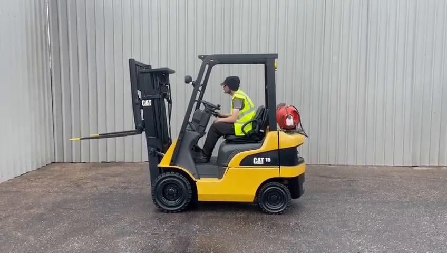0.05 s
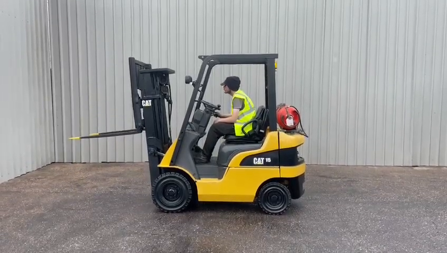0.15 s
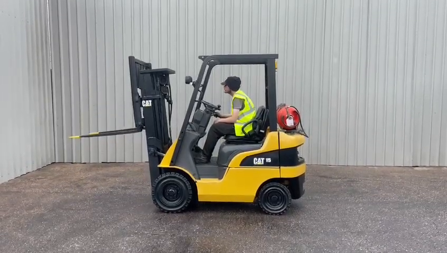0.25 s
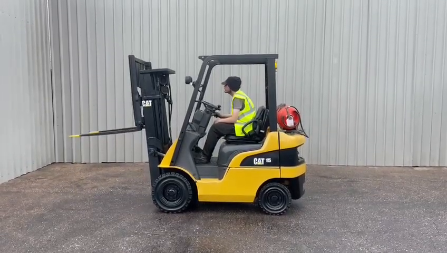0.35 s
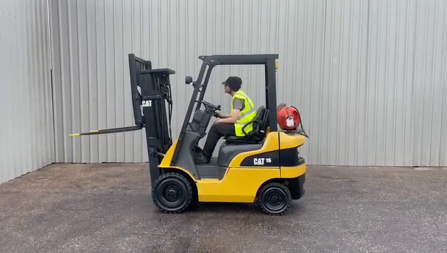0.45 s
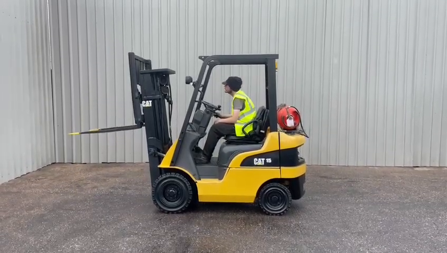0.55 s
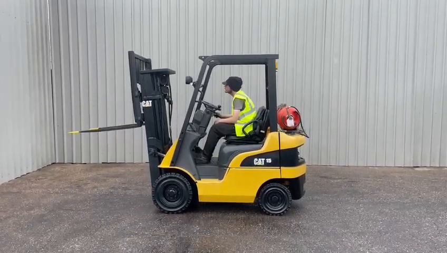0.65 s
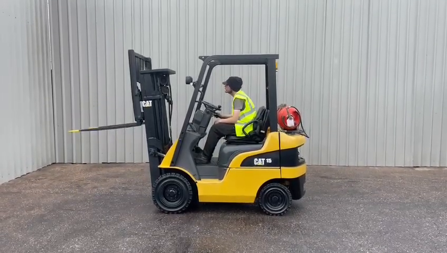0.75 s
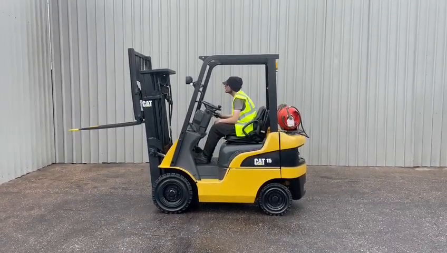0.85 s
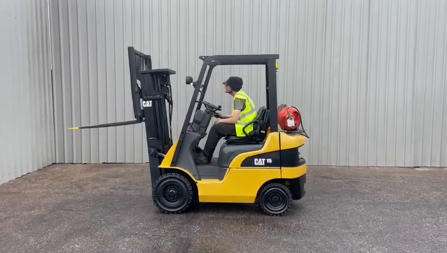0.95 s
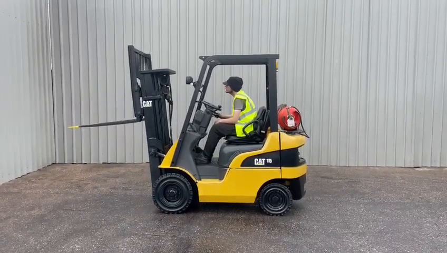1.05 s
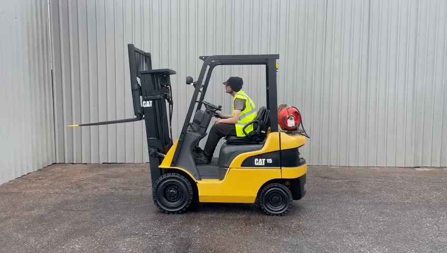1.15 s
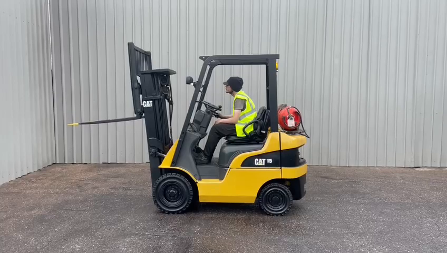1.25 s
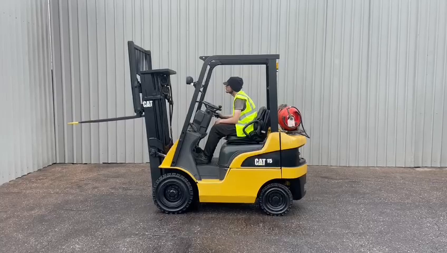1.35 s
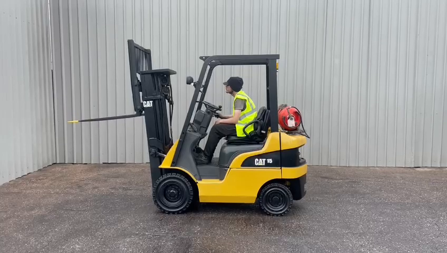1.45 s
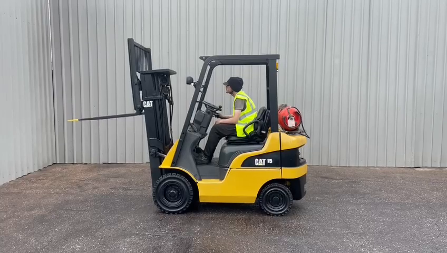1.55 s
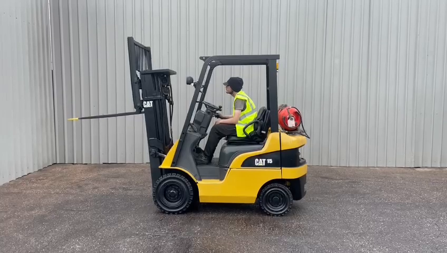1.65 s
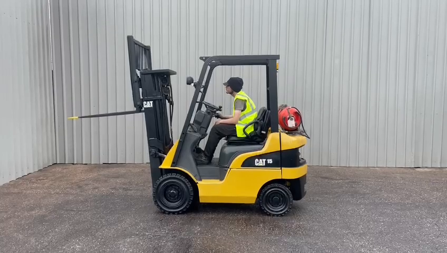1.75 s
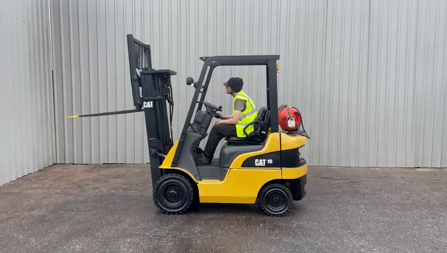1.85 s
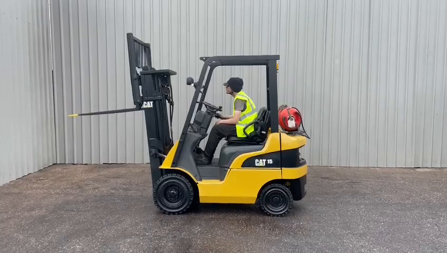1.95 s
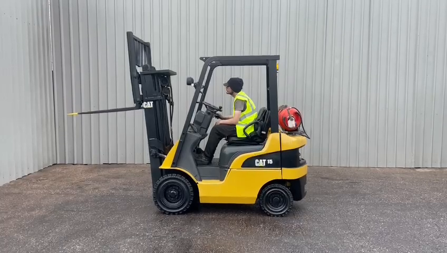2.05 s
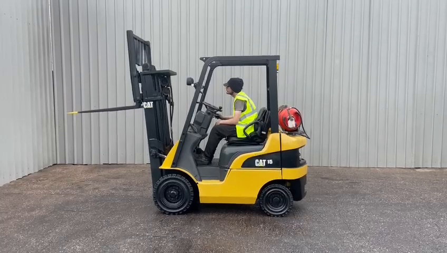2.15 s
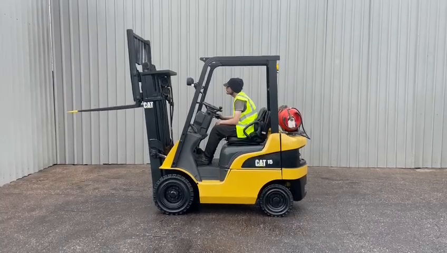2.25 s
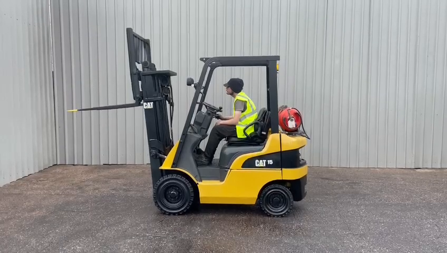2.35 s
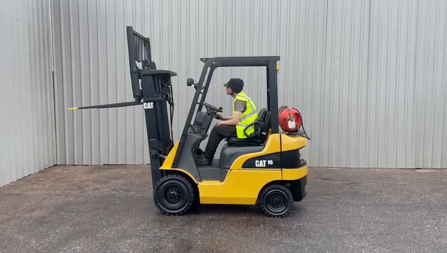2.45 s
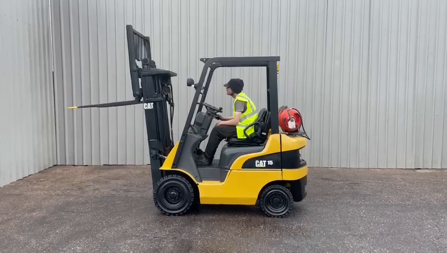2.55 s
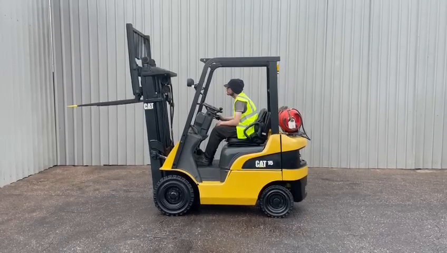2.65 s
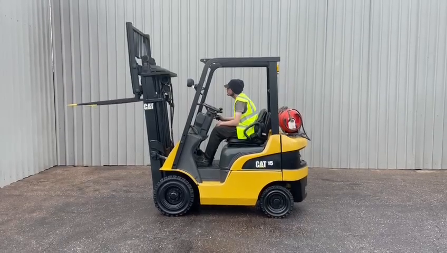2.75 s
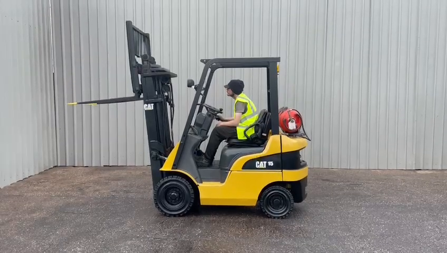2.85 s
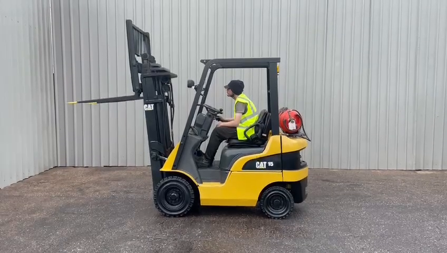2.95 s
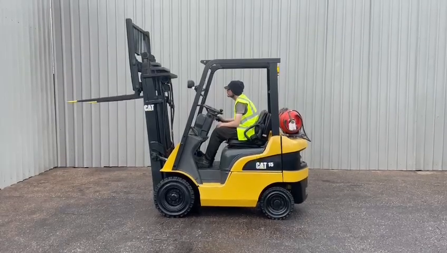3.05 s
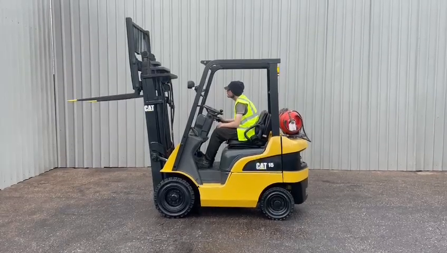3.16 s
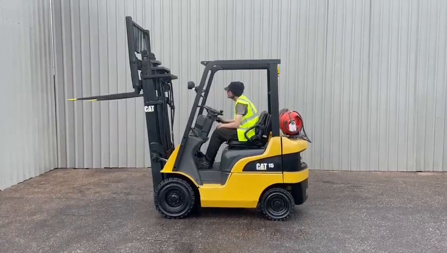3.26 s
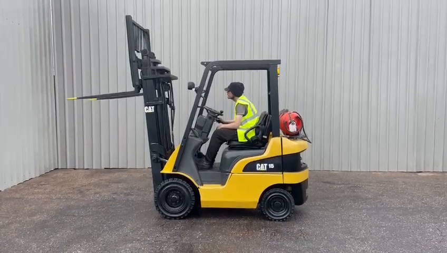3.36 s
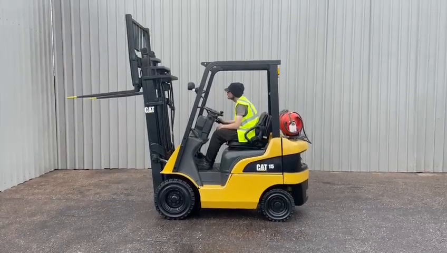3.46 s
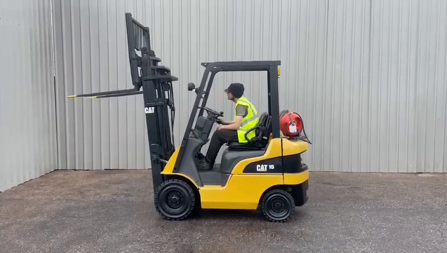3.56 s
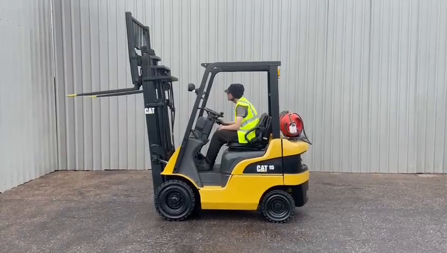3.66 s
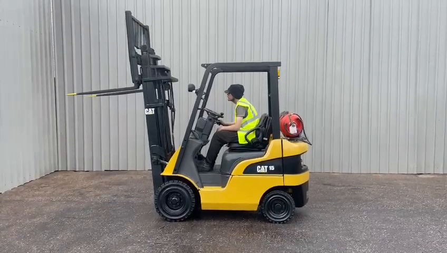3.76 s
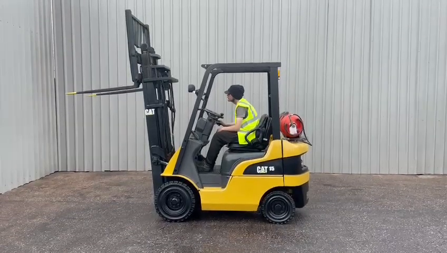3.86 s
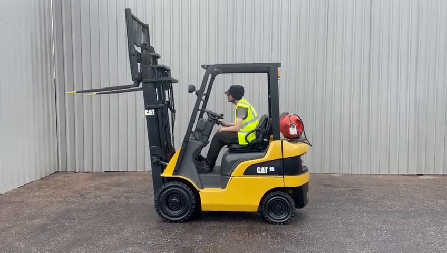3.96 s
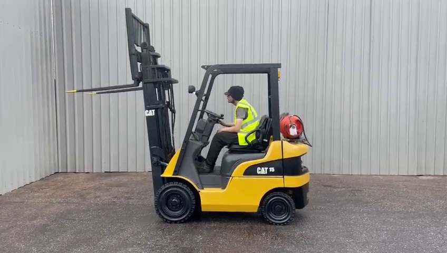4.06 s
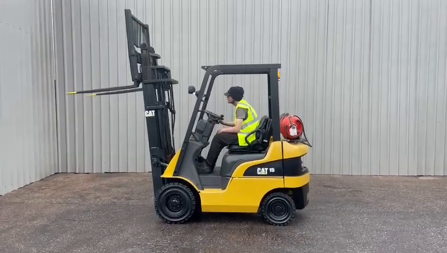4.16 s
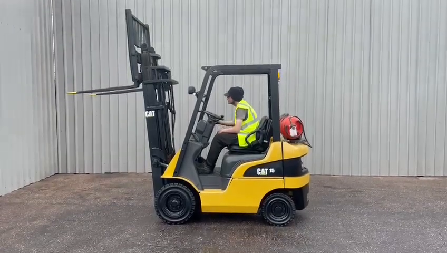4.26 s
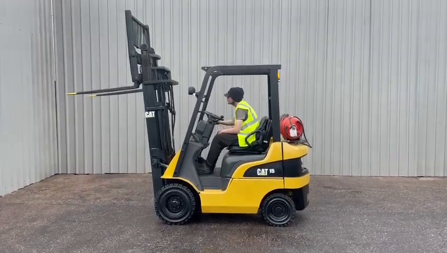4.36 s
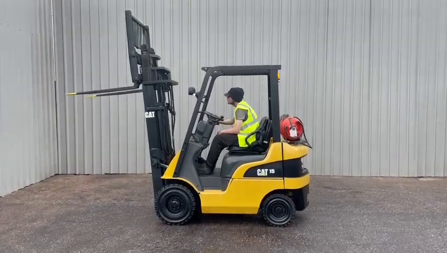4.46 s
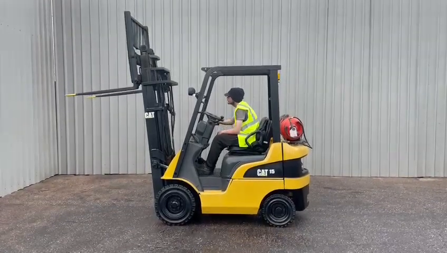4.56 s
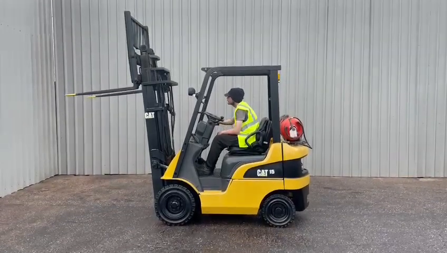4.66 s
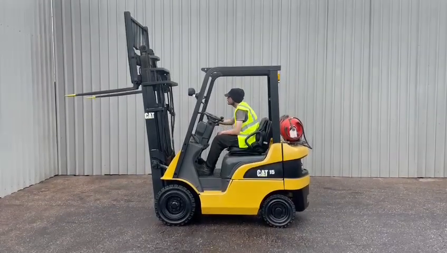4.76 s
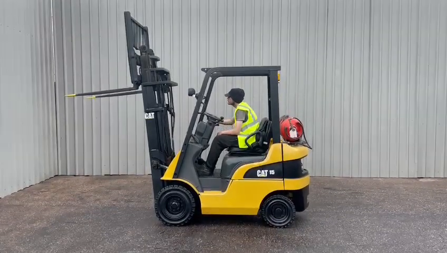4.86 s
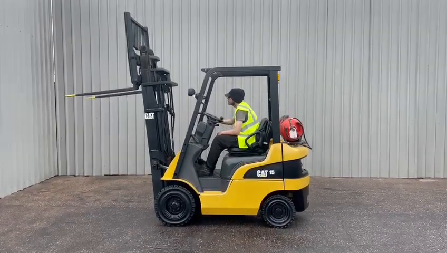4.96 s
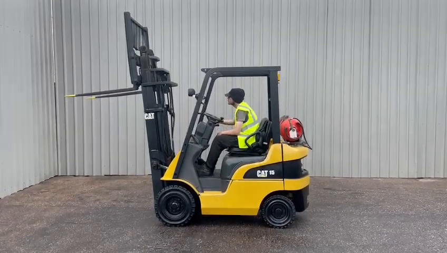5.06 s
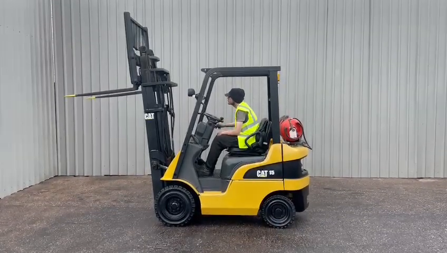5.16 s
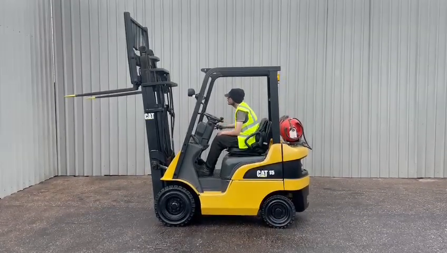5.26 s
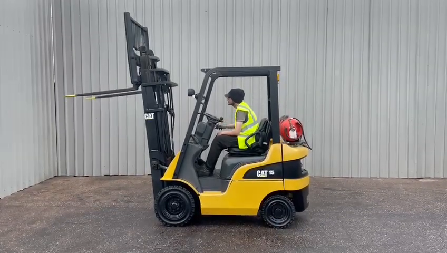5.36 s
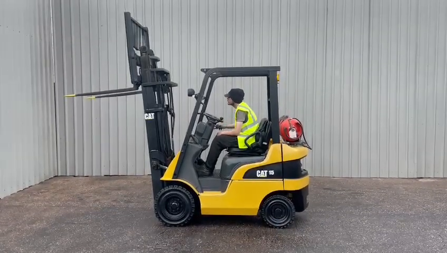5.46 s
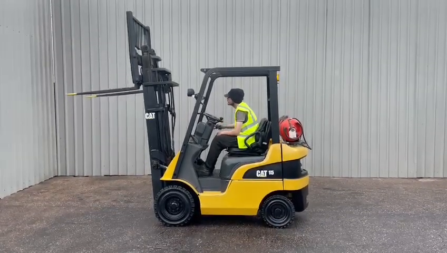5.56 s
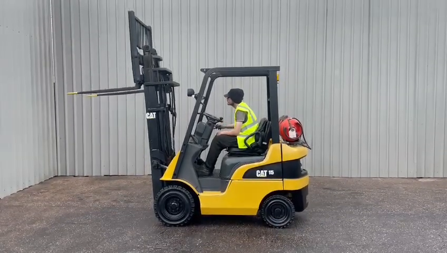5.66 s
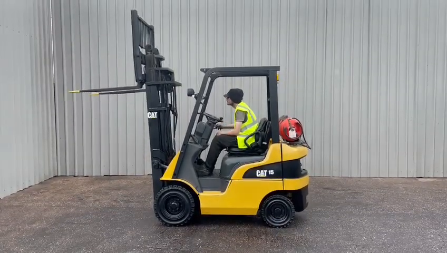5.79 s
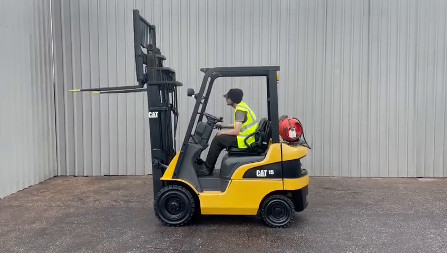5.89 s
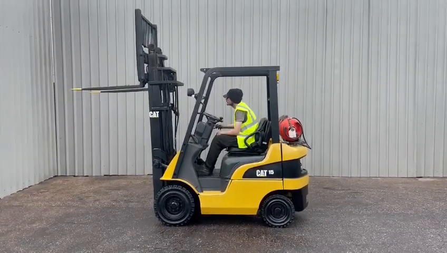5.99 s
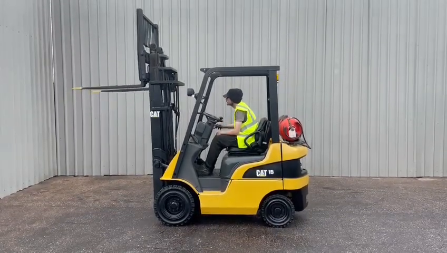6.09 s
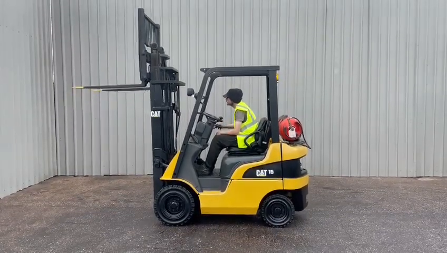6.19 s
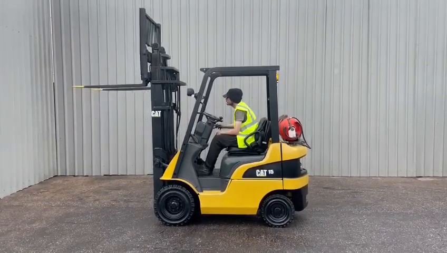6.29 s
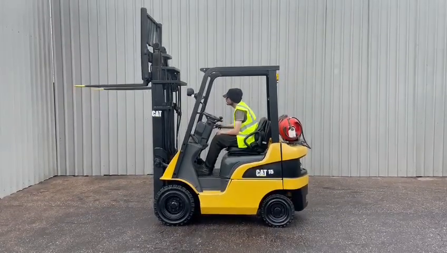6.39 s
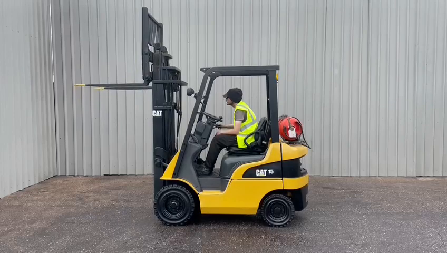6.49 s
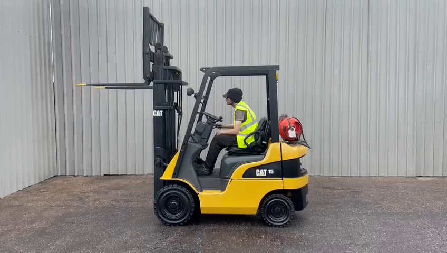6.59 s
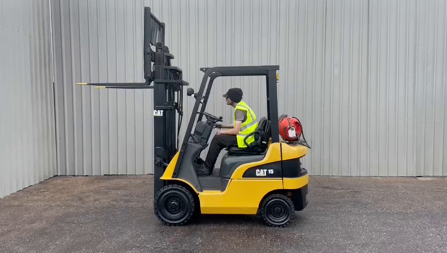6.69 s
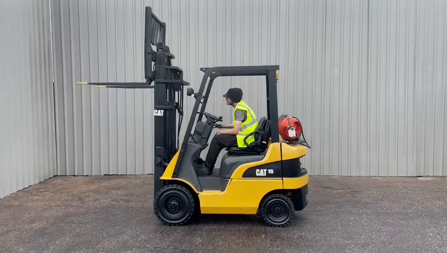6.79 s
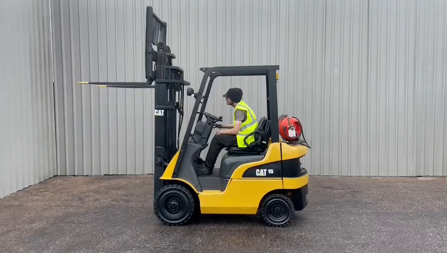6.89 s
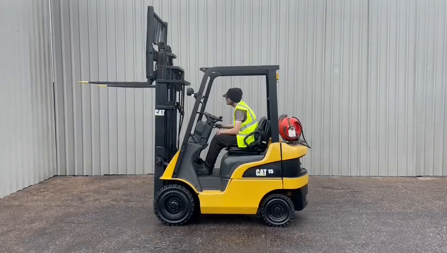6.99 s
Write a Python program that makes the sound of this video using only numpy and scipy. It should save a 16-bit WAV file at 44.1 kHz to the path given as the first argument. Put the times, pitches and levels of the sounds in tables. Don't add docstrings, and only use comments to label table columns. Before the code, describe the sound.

A small four-cylinder engine drones under load, panels roaring, gears and hydraulic pump whining, lift chains fizzing faintly. After a sharp double clack, a rough pulley note joins in. A clattering metal bang ends the lift and rings around the hard-walled yard. The whine drops, revs plunge and stumble, then the engine rattles back, rises a little with rubbing rollers, and sinks to a lumpy idle. Heard close, in stereo.

```python
import sys
import numpy as np
from scipy import signal
from scipy.fft import rfft, irfft
from scipy.io import wavfile
from scipy.ndimage import uniform_filter1d

SR = 44100
rng = np.random.default_rng(int(sys.argv[2]) if len(sys.argv) > 2 else 0)


def materialize(psi):
    bounded = np.clip(np.atleast_2d(psi).T, -1, 1)
    quanta = np.round(bounded * 32767).astype(np.int16)
    wavfile.write(sys.argv[1], SR, quanta)


def ratio_of_db(decibels):
    return 10 ** (np.asarray(decibels, float) / 20)


N = 310023
T = np.arange(N) / SR
STOP_S, CATCH_S = 4.6, 5.24
DRAIN_S = 0.17


def evened(x):
    return x / np.sqrt(np.mean(x ** 2) + 1e-20)


def read(points, hz):
    f, value = np.transpose(points)
    return np.interp(np.log(hz + 1), np.log(f + 1), value)


def curves(rows):
    s, *columns = np.transpose(rows)
    return [np.interp(T, s, c) for c in columns]


def spells(rows, floor_db, rise, fall):
    for s, hold, db in rows:
        before, after = np.maximum(s - T, 0), np.maximum(T - s - hold, 0)
        floor_db = np.maximum(floor_db, db - rise * before - fall * after)
    return floor_db


def lifting(on, off, fade_s):
    return on + (off - on) * np.clip((T - STOP_S) / fade_s, 0, 1)


def drift(hz):
    lowpass = 1 + (np.fft.rfftfreq(N, 1 / SR) / hz) ** 4
    return evened(irfft(rfft(rng.standard_normal(N)) / lowpass, N))


def ring(x, hz, width):
    pole = np.exp((2j * np.pi * hz - np.pi * width) / SR)
    return 2 * signal.lfilter([1 - abs(pole)], [1, -pole], x).real


def ring_twice(x, hz, width):
    return ring(ring(x, hz, width), hz, width)


# (frequency [Hz], left-right likeness [0-1])
LIKENESS = [(60, 0.98), (130, 0.83), (270, 0.92), (580, 0.39), (1240, 0.36), (2650, 0.81), (5650, 0.86),
            (12100, 0.52)]


def noise(spectrum, patchy_db):
    hz = np.fft.rfftfreq(1024, 1 / SR)
    a, b, c, d, patches = rng.standard_normal((N // 256 + 5, 513, 5)).T
    patches = evened(uniform_filter1d(uniform_filter1d(patches, 6, 0), 16, 1))
    same = np.clip(abs(read(LIKENESS, hz)), 0, 1)[:, None]
    left = a + 1j * b
    right = same * left + np.sqrt(1 - same ** 2) * (c + 1j * d)
    z = np.array([left, right]) * ratio_of_db(read(spectrum, hz)[:, None] + patchy_db * patches)
    return evened(signal.istft(z, nperseg=1024, noverlap=768)[1][:, :N])


# (frequency [Hz], level [dB])
PANEL = [(300, -4), (400, -2.5), (500, -11.5), (610, -3.5), (660, 3), (800, -1.5), (1000, -8.5), (1600, -7)]


def whine(turns, orders, waver_db, panel=.0):
    sides, hz = np.array([[1], [-1]]), np.gradient(turns) * SR
    out = 0
    for k, db in orders:
        level = np.sqrt(2) * ratio_of_db(db + waver_db * drift(3.5) + panel * read(PANEL, k * hz))
        out = out + level * np.cos(2 * np.pi * k * turns + .7 * drift(9) + .3 * sides * drift(3))
    return out


# (frequency [Hz], level [dB])
SILENCER = [(20, -46), (40, -18), (58, -21.5), (72, -12.5), (97, -12), (118, 2.5), (140, -13), (165, 5.5),
            (190, -9), (215, -1.5), (245, -32.5), (320, -35), (500, -45), (1500, -110)]
# (frequency [Hz], level [dB])
RUMBLE = [(20, -43.5), (35, -16), (60, 10.5), (110, 7.5), (200, 10), (240, 0), (330, -17), (500, -50)]
EVEN_LIFT, EVEN_REST = .17, .07
STUMBLE, STUMBLE_END_S, RECOVER_S = .45, 5.45, .25
RUMBLE_DB, RUMBLE_STUMBLE_DB = -11.5, 8
BOOM_LATE_S, BOOM_TOP_HZ = .04, 100
SNAP = .27
BOOM_LIFT_DB, BOOM_REST_DB, BOOM_RISE_S = -17, -2.5, 0.89
THROAT_LIFT_DB, THROAT_REST_DB, THROAT_HZ = -18, -10.5, 180


def exhaust(turns, level_db):
    stumble = lifting(0, 1, .12) * np.exp(-np.maximum(T - STUMBLE_END_S, 0) / RECOVER_S)
    uneven = lifting(EVEN_LIFT, EVEN_REST, .12) + STUMBLE * stumble
    rumble_db = RUMBLE_DB + RUMBLE_STUMBLE_DB * stumble
    at = np.flatnonzero(np.diff(np.floor(turns)))
    size, late = rng.standard_normal((len(at), 2)).T
    puffs = np.zeros(N)
    puffs[np.clip(at + (60 * uneven[at] * late).astype(int), 0, N - 1)] = 1 + uneven[at] * size

    hz = np.fft.fftfreq(16384, 1 / SR)
    log_gain = np.log(ratio_of_db(read(SILENCER, abs(hz))))
    boom_hz = np.clip(hz, -BOOM_TOP_HZ, BOOM_TOP_HZ)
    phase = -SNAP * signal.hilbert(log_gain).imag - 2 * np.pi * BOOM_LATE_S * boom_hz
    pipe = np.fft.fftshift(np.fft.ifft(np.exp(log_gain + 1j * phase)).real) * np.hanning(16384)

    drone = signal.fftconvolve(puffs, pipe, "same")
    drone /= np.sqrt(uniform_filter1d(drone ** 2, size=9000) + 1e-12)
    gas = drone + ratio_of_db(rumble_db) * noise(RUMBLE, 1.84)
    gas += ratio_of_db(lifting(BOOM_LIFT_DB, BOOM_REST_DB, BOOM_RISE_S)) * 3 * ring_twice(gas, 64.7, 60)
    gas += ratio_of_db(lifting(THROAT_LIFT_DB, THROAT_REST_DB, 1.3)) * 2 * ring_twice(drone, THROAT_HZ, 42)
    return ratio_of_db(level_db + 0.19) * gas / np.sqrt(1 + ratio_of_db(rumble_db) ** 2)


# (frequency [Hz], level [dB])
ROAR = [(150, -10), (280, 1.5), (400, 0.5), (520, -7.5), (650, -2), (800, -5), (1000, -9.5), (1300, -12),
        (2000, -44.5)]
CLATTER = [(700, -23.5), (1100, -7.5), (1450, 2), (1800, -4.5), (2100, -1.5), (2650, -3), (3000, -8),
           (3600, -7.5), (4250, -8.5), (4600, -19.5), (6000, -21), (8000, -55.5)]
HISS = [(2500, -30.5), (4500, 12.5), (6000, 7), (7000, 9.5), (8500, -4.5), (10000, -25), (11700, -39),
        (11900, -70)]
# (time [s], hold [s], level [dB])
RELIEF = [
    (5.0, .05, -65),
    (5.27, 0.16, -56),
]
ROAR_DB, ROAR_SLOPE, CLATTER_DB, CLATTER_SLOPE = -35.5, 0.4, -41, 0.43
LULL_DB, LULL_START_S = -3.5, 4.84
HISS_LIFT_DB, HISS_REST_DB = -58, -65


def body(turns, hz):
    shut = np.clip((T - LULL_START_S) / 0.29, 0, 1)
    lull_db = LULL_DB * shut * np.clip((CATCH_S + 0.058 - T) / 0.11, 0, 1)
    roar_swell_db = spells([(STOP_S, .05, 6), (3.0, 1.2, 1.5), (5.33, .5, 2)], 0, rise=180, fall=16)
    clatter_swell_db = spells([(STOP_S, .03, 6), (5.33, .45, 1.5)], 0, rise=110, fall=56)
    roar_db = ROAR_DB + ROAR_SLOPE * (hz - 40) + lull_db + roar_swell_db
    clatter_db = CLATTER_DB + CLATTER_SLOPE * (hz - 40) + lull_db + clatter_swell_db
    hiss_db = spells(RELIEF, lifting(HISS_LIFT_DB, HISS_REST_DB, DRAIN_S), rise=120, fall=16)
    beat = evened(1 + lifting(0.55, 0.77, .6) * np.exp(-(turns % 1) / 0.11))
    flicker = ratio_of_db(0.76 * drift(29))
    roar = ratio_of_db(roar_db) * noise(ROAR, .9)
    clatter = ratio_of_db(clatter_db) * beat * noise(CLATTER, 1.63)
    return roar + flicker * (clatter + ratio_of_db(hiss_db + 0.5) * noise(HISS, 3.1))


# (order [per firing], level [dB])
PUMP = [(10.31, -3.5), (15.45, -1.5), (20.65, -7), (25.75, -5), (31, -14), (36.1, -7.5), (41.6, -8.5)]
GEAR = [(12.42, -1), (24.8, -15.5), (37.3, -13.5)]
TOOTH = [(56.1, -2.5)]
IDLER = [(15.45, -14), (20.65, -6.5), (25.75, -10.5)]
# (time [s], hold [s], loss [dB])
PUMP_SLACK = [
    (.95, 0.36, 4.5),
    (1.75, 0.49, 8),
    (4.15, 0.35, 3.5),
]
# (time [s], hold [s], level [dB])
TOOTH_SING = [
    (.15, .3, -49.5),
    (.59, .02, -52),
    (.755, 0.05, -44.5),
    (.9, .02, -47),
    (.97, 0.1, -42),
    (1.13, .05, -43),
    (1.28, .02, -49),
    (1.34, .02, -50),
    (1.58, 0.2, -45.5),
    (2.1, .2, -52),
]
# (time [s], hold [s], level [dB])
PUMP_SURGE = [
    (5.53, 0.4, -45),
    (6.35, 0.19, -49),
]
PUMP_LIFT_DB, PUMP_REST_DB, TOOTH_LIFT_DB, TOOTH_REST_DB = -40, -50, -55, -71
GEAR_DB, GEAR_CASE_HZ, GEAR_WIDTH_HZ = -40.5, 40.84, 0.74


def hydraulics(turns, hz):
    pump_db = lifting(PUMP_LIFT_DB, PUMP_REST_DB, DRAIN_S) - spells(PUMP_SLACK, 0, rise=27, fall=34)
    gear_db = GEAR_DB - 20 * np.log10(1 + ((hz - GEAR_CASE_HZ) / GEAR_WIDTH_HZ) ** 2)
    tooth_db = spells(TOOTH_SING, lifting(TOOTH_LIFT_DB, TOOTH_REST_DB, DRAIN_S), rise=500, fall=400)
    hum_db = spells(PUMP_SURGE, -82, rise=87.0, fall=65)
    pump = ratio_of_db(pump_db) * whine(turns, PUMP, 2.23, 0.9)
    gear = ratio_of_db(gear_db) * whine(turns, GEAR, 0.94)
    tooth = ratio_of_db(tooth_db) * whine(turns, TOOTH, 1.5)
    return pump + gear + tooth + ratio_of_db(hum_db) * whine(turns, IDLER, 4.0)


# (order [per firing], level at 40 firings a second [dB rms])
FAN = [(1.442, -35), (2.17, -35.5), (5.49, -36.5)]


def fan(turns, hz):
    return (hz / 40) ** 3 * whine(turns, FAN, 3.1).mean(0)


# (time [s], peak level [dB], rattle length [s], brightness [dB])
CLACKS = [(2.3135, -28, 0.004, -2), (2.316, -27.5, 0.008, 0), (2.338, -25, 0.022, -3.5),
          (4.239, -33, 0.013, -21), (4.56, -26.5, 0.015, -12), (4.582, -25, 0.01, -1),
          (4.588, -18.5, 0.0085, -7), (4.594, -12, .008, -6.5), (4.6, -12.5, 0.007, -6),
          (4.607, -17, .006, -3), (4.613, -15, .01, -3), (4.621, -20.5, .006, 0), (4.628, -21, 0.012, -1),
          (4.634, -21, .012, -3.5), (4.645, -22, 0.011, -5.5), (4.659, -25.5, .008, -1),
          (4.669, -28, .006, 0), (4.681, -29, .008, -1), (4.702, -31, .008, 0), (4.72, -32.5, .02, -1),
          (5.243, -42, .008, 9), (5.251, -44, .012, 9), (5.36, -39, .006, 1.5), (5.41, -33.5, .006, 4),
          (5.424, -36, .006, 5.5)]
# (frequency [Hz], width [Hz], level [dB])
MAST_LOW = [(483, 140, -13), (586, 173, 1), (630, 160, -1.5), (728, 190, -3), (996, 130, -6.5)]
MAST_HIGH = [(1110, 380, -5), (1700, 480, -6.5), (2000, 570, -6.5), (2570, 950, -11.5), (3800, 3100, -22.5),
             (5150, 510, -26.5), (10300, 3300, -38.5)]


def mast():
    dull, bright = np.zeros(N), np.zeros(N)
    rattle = rng.standard_normal(N)
    for s, db, length, bright_db in CLACKS:
        decay = np.exp(-np.maximum(T - s, 0) / length)
        blow = ratio_of_db(db) * decay * np.clip((T - s) / 0.0014, 0, 1) * rattle
        bright += ratio_of_db(bright_db) * blow
        dull += 0.42 * blow
        dull[round(s * SR) + 20] += 11 * ratio_of_db(db)
    low = sum(ratio_of_db(db) * ring_twice(dull, hz, width) / np.sqrt(width) for hz, width, db in MAST_LOW)
    high = sum(ratio_of_db(db) * ring_twice(bright, hz, width) / np.sqrt(width) for hz, width, db in MAST_HIGH)
    return ratio_of_db(39.0) * (low + high)


# (time [s], peak level [dB], pitch [Hz], t60 [s])
TICKS = [(2.311, -11.5, 630, .05), (2.311, -15, 766, .04), (2.315, -41, 3800, .05),
         (2.315, -49, 10800, .05), (2.312, -24, 910, .035), (2.6, -27, 770, .04), (2.382, -29, 600, .03),
         (2, -34, 1350, .04), (2.34, -35, 2150, .03), (4.6, -22.5, 362, .15), (4.594, -18.5, 1960, .04),
         (4.612, -29, 2620, 0.048), (4.63, -33, 5160, 0.084), (4.645, -37, 4700, .06),
         (4.628, -30, 2500, 0.052), (4.235, -27, 620, .09), (4.24, -30, 720, .07), (3.33, -33, 648, .4),
         (5.273, -29, 2150, .04), (5.285, -34.5, 2100, .04), (5.9, -39.5, 1980, .04), (4.8, -47, 4200, .04),
         (5.473, -36, 1900, .03), (4.596, -21, 280, 0.16), (4.592, -35.5, 6400, 0.047),
         (5.41, -39, 2600, 0.027), (5.427, -44, 6500, .03), (4.551, -15.5, 648, 0.079),
         (4.563, -17.5, 670, 0.051), (4.645, -27, 1800, 0.072), (5.746, -32.5, 2600, 0.045),
         (5.43, -34.5, 3400, .03), (3.25, -42, 10360, 0.03)]
# (time [s], peak level [dB], pitch [Hz], t60 [s])
THUMPS = [
    (1.12, -17.5, 72, .25),
    (5.33, -15.5, 76, 0.23),
    (5.9, -17.5, 66, .25),
    (6.21, -16, 72, .25),
]
# (time [s], peak level
# [dB], pitch [Hz], t60 [s])
MORE_TICKS = [(5.24, -37, 4250, 0.039), (5.241, -33, 1490, 0.045), (5.246, -30.5, 1800, 0.04),
              (5.255, -36, 1050, .03), (5.275, -37, 1600, .03), (5.343, -36.5, 1950, .035),
              (1.12, -17.5, 72, .25), (5.33, -15.5, 76, 0.23), (5.9, -17.5, 72, .25), (6.21, -16, 72, .25),
              (5.565, -40, 4230, .04), (5.845, -42, 4240, .04), (5.249, -32, 2800, 0.042),
              (5.26, -33, 4200, 0.035), (5.255, -29, 2050, .04), (5.265, -31, 2052, 0.04),
              (5.283, -39, 4200, .05), (5.352, -37, 4980, 0.045), (5.41, -31, 1600, 0.045), (5, -33, 1900, .03),
              (5.38, -35.5, 1450, .05), (5.427, -37, 4980, 0.045), (6.7, -43.5, 4222, 0.041),
              (6, -44, 4227, 0.046), (7.1, -45, 4230, 0.051), (5.569, -36.5, 2550, .07),
              (5.67, -38, 1579, 0.08)]


def ticks():
    out, rattle = np.zeros(N), rng.standard_normal(N)
    for s, db, hz, t60 in TICKS + THUMPS + MORE_TICKS:
        at = min(round(s * SR), N - 6000)
        t = np.maximum(T[at:at + 6000] - s, 0)
        width, rise_s = min(220, hz / 3), max(.0025, 2 / hz)
        rough = evened(ring_twice(rattle[at:at + 6000], hz, width))
        tone = 1.2 * np.sin(2 * np.pi * hz * t) + 0.3 * rough
        out[at:at + 6000] += ratio_of_db(db - 2.5 - 60 * t / t60) * np.clip(t / rise_s, 0, 1) * tone
    return out


# (frequency [Hz], level [dB])
JINGLE = [(3000, -25), (5000, 3), (7000, 1.5), (8500, 3.5), (10000, -5.5), (11300, -3.5), (11750, -11),
          (11900, -45.5)]
# (time [s], hold [s], level [dB])
JERKS = [(2.31, 0.034, -58), (3.245, .01, -68), (3.52, 0.071, -61.5), (3.83, 0.047, -60.5),
         (4.1, 0.043, -61), (4.19, 0.028, -59.5), (4.25, .03, -64), (4.42, .05, -58.5), (4.6, 0.057, -55),
         (4.99, 0.033, -61), (5.23, .04, -65), (7.02, .02, -71)]
CHAIN_LIFT_DB, CHAIN_REST_DB = -68.5, -74.5


def chains():
    level_db = spells(JERKS, lifting(CHAIN_LIFT_DB, CHAIN_REST_DB, .6), rise=440, fall=75)
    return ratio_of_db(level_db + 10.5 + 1.6 * drift(54)) * noise(JINGLE, 4.2)


# (time [s], hold [s], level [dB])
RUBS = [
    (4.2, .03, -49),
    (4.61, .02, -50),
    (5.27, .03, -51),
    (5.42, .02, -47),
    (5.55, 0.034, -47),
    (5.65, .04, -49.5),
    (5.8, .04, -50),
    (5.97, .02, -54),
    (6.1, .2, -57),
    (6.49, .03, -53.5),
]
ROLL_LIFT_DB, ROLL_REST_DB = -59, -68


def roller():
    rub = rng.standard_normal((2, N))
    rub[1] = .8 * rub[0] + 0.71 * rub[1]
    level_db = spells(RUBS, lifting(ROLL_LIFT_DB, ROLL_REST_DB, DRAIN_S), rise=280, fall=130)
    return ratio_of_db(level_db - 5.0 + 0.81 * drift(30)) * evened(ring_twice(rub, 4250, 170))


# (time [s], hold [s], level [dB])
SCRAPES = [
    (2.36, .12, -49),
    (2.6, .14, -46.5),
    (3.36, .05, -49.5),
    (5.53, 0.072, -52),
    (5.7, 0.22, -53),
    (6.0, .4, -55),
]
SCRAPE_HZ, SCRAPE_WIDTH_HZ = 2530, 140


def scrape():
    rasp = ring_twice(rng.standard_normal(N), SCRAPE_HZ, SCRAPE_WIDTH_HZ)
    return ratio_of_db(spells(SCRAPES, -74.5, rise=200, fall=150) + 1.5 * drift(30)) * evened(rasp)


# (frequency [Hz], level [dB])
FRAME = [(970, -56), (2645, -61)]
# (time [s], hold [s], level [dB])
PULLEY_RUN = [
    (2.45, .1, -47),
    (2.75, .15, -49),
    (3.1, .4, -46),
    (3.75, .25, -48),
]
PULLEY_HZ, PULLEY_SAG_HZ_PER_S = 782, 34


def hums():
    pulley_hz = PULLEY_HZ - PULLEY_SAG_HZ_PER_S * (T - PULLEY_RUN[0][0]) + 14 * drift(14)
    turns = np.cumsum(pulley_hz) / SR
    pulley = ratio_of_db(spells(PULLEY_RUN, -90, rise=100, fall=100)) * whine(turns, [(1, 0)], 4.5)
    return pulley + ratio_of_db(lifting(0, -14, DRAIN_S)) * whine(T, FRAME, 4.5)


# (frequency [Hz], t60 [s])
YARD = [(200, 1), (700, 0.23), (2000, 0.68), (6000, 0.37)]


def yard(x):
    taps = np.zeros((2, SR))
    at = np.arange(500, SR - 40, 20)
    at = at + rng.integers(0, 20, (2, len(at)))
    np.put_along_axis(taps, at, rng.choice([-1., 1.], at.shape), 1)
    hz, t, z = signal.stft(taps, SR, nperseg=256)
    tail = signal.istft(z * ratio_of_db(-60 * t / read(YARD, hz)[:, None]), SR, nperseg=256)[1]
    tail[1] = 0.29 * tail[0] + 1.0 * tail[1]
    return signal.fftconvolve(x[None], tail / np.linalg.norm(tail[0]), axes=1)[:, :N]


# (time [s], firing rate [Hz], exhaust level [dB])
ENGINE = [(0, 37.4, -21), (1.0, 39.93, -20.5), (2.3, 41.34, -18.5), (2.5, 40.37, -20.5),
          (3.1, 38.33, -21.5), (4.08, 38.85, -21), (4.54, 42.9, -18), (4.63, 38.57, -20.5),
          (4.74, 31.38, -21), (4.91, 26.62, -24), (5.13, 28.13, -26), (5.28, 27.49, -22.5),
          (5.58, 31.15, -23), (5.77, 31.73, -21.5), (6.01, 29.97, -20.5), (6.34, 26.1, -21.5),
          (6.79, 23.22, -22.5), (7.03, 23.81, -21.5)]


def scene():
    hz, level_db = curves(ENGINE)
    turns = np.cumsum(hz) / SR
    engine = exhaust(turns, level_db) + body(turns, hz) + hydraulics(turns, hz) + fan(turns, hz)
    blows, small = mast(), ticks()
    echo = ratio_of_db(-5.0) * yard(blows + ratio_of_db(-9.5) * small)
    return engine + blows + small + chains() + roller() + scrape() + hums() + echo


def low_pass(x):
    return signal.sosfilt(signal.butter(12, 12660, fs=SR, output="sos"), x)


# (frequency [Hz], left over right level [dB])
LEAN = [(60, -1), (170, 0), (500, 1.5), (1450, 1), (5000, 1.3), (6800, 1.5)]
# (frequency [Hz], left lead [rad])
LEAD = [(6500, 0), (7650, -np.pi), (9300, -np.pi), (10000, -2 * np.pi)]
# (frequency [Hz], share kept [0-1])
WIDE = [(5500, 1), (7000, 0)]
EDGE_HZ = 11830


def record(dry):
    padded = np.pad(dry, [(0, 0), (4096, 4097)], "reflect")
    hz = np.fft.rfftfreq(padded.shape[1], 1 / SR)
    left, right = rfft(padded)
    mid, side = (left + right) / 2, read(WIDE, hz) * (left - right) / 2
    half = ratio_of_db(read(LEAN, hz) / 2) * np.exp(.5j * read(LEAD, hz))
    ports = irfft(np.array([(mid + side) * half, (mid - side) / half]) * (hz < EDGE_HZ), padded.shape[1])
    opening = np.minimum(T / .004, 1)
    return low_pass(opening * ports[:, 4096:4096 + N])


dry = scene()
out = record(dry)
materialize(out)
```